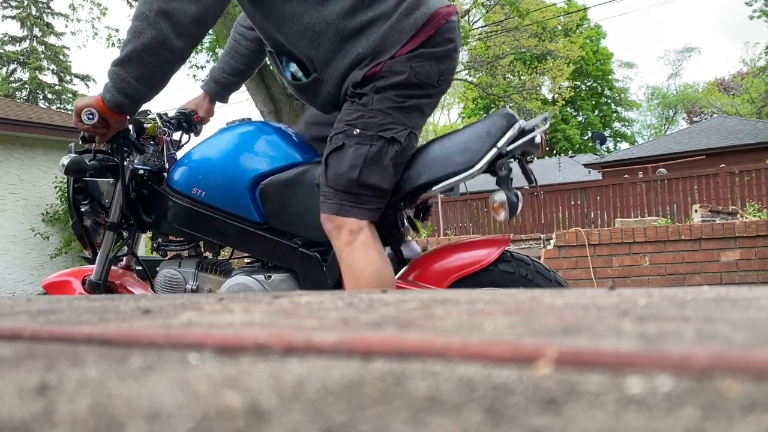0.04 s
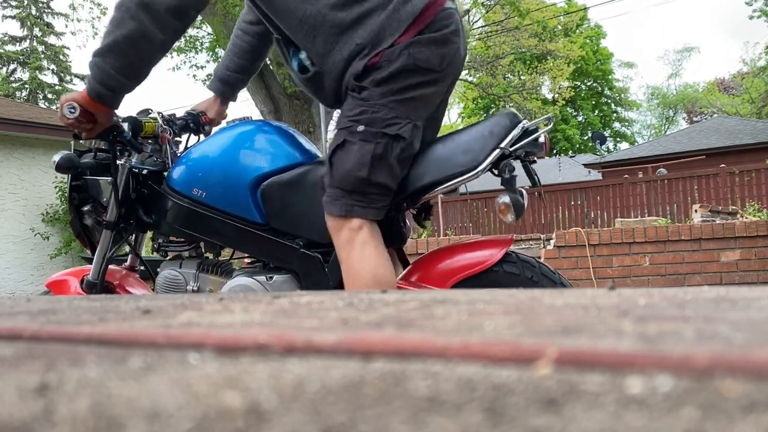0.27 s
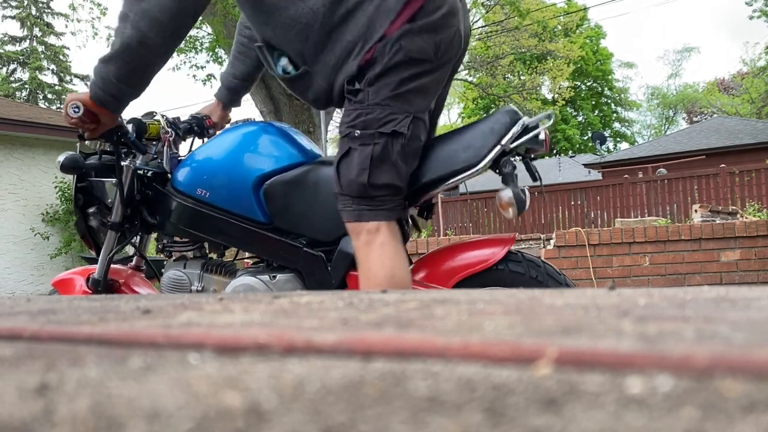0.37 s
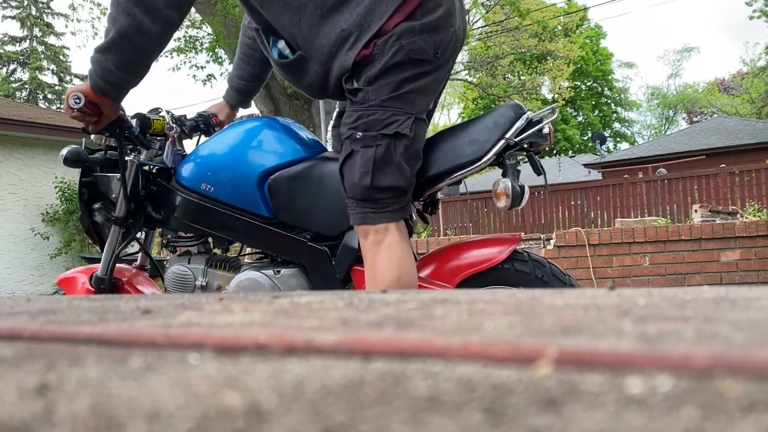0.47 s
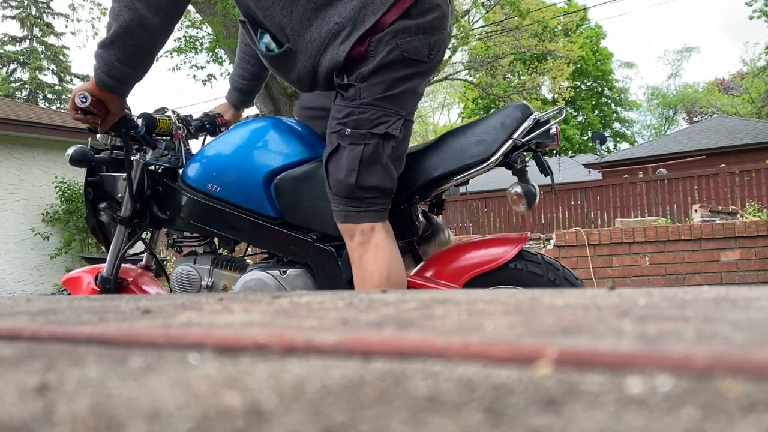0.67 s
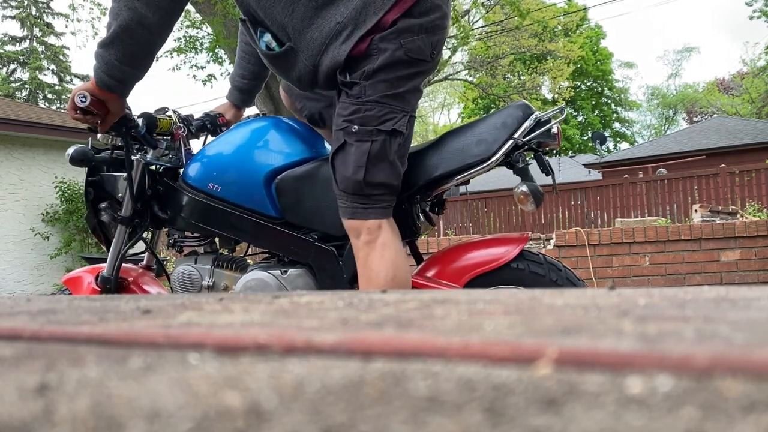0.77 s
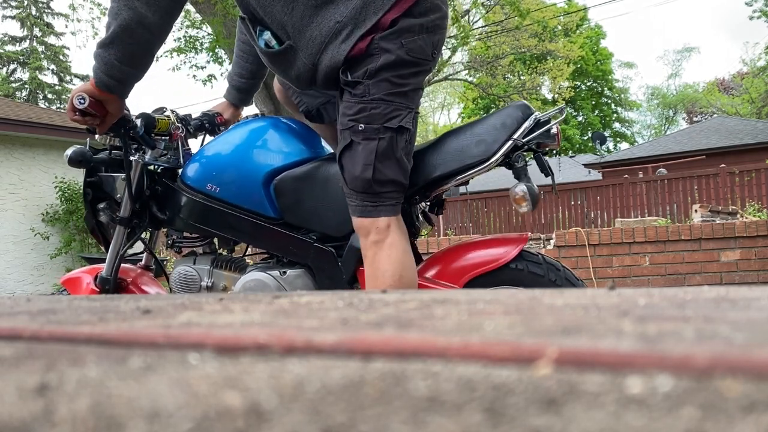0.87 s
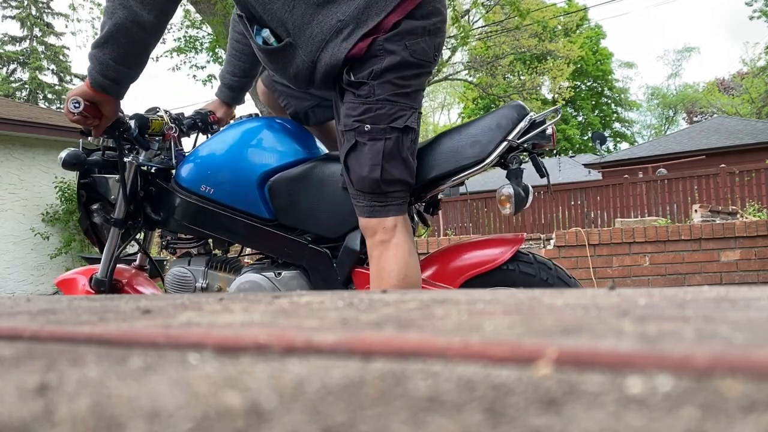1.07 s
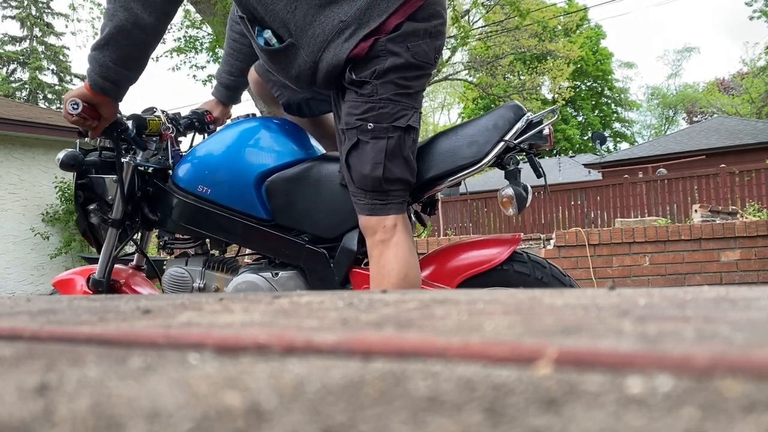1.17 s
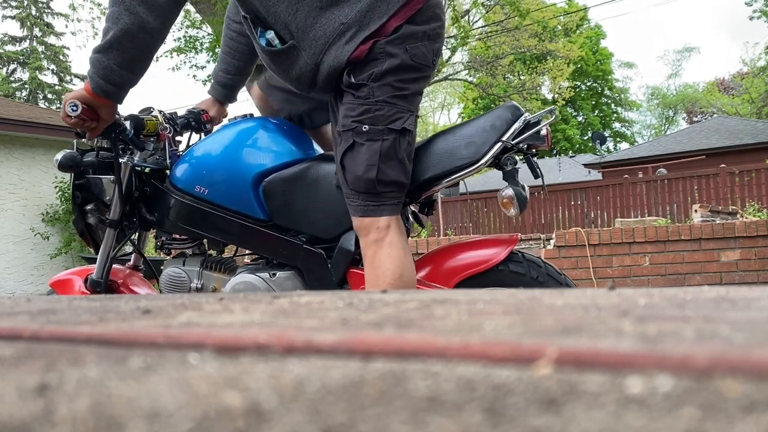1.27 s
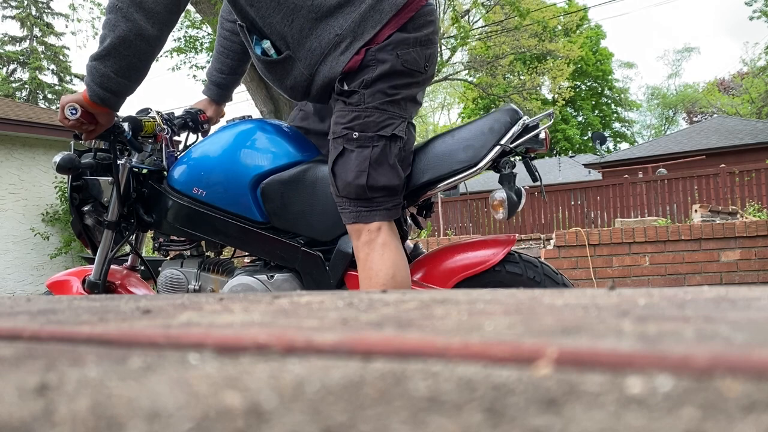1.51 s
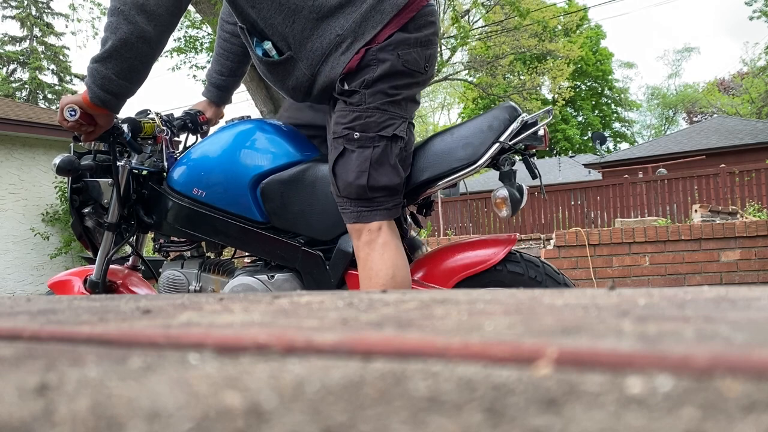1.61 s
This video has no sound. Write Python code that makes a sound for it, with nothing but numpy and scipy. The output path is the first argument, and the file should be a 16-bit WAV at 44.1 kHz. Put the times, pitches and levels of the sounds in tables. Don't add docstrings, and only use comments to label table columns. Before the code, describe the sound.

A small motorcycle engine is kicked over, thumps six quick exhaust strokes, then stalls with a gasp

```python
import sys
import numpy as np
from scipy import signal
from scipy.fft import rfft, irfft
from scipy.io import wavfile
from scipy.ndimage import uniform_filter1d

SR = 44100
rng = np.random.default_rng(int(sys.argv[2]) if len(sys.argv) > 2 else 0)


def volts(x):
    e = np.asarray(x, float) / 20
    return 10 ** e


def dump(signal):
    limited = np.clip(np.atleast_2d(signal).T, -1, 1)
    pcm = np.round(limited * 32767).astype(np.int16)
    wavfile.write(sys.argv[1], SR, pcm)


N = 72765

# crest_s, level_db, pitch_hz, swell_s, bite_db
STROKES = [
    (0.227, 0, 105, 0.018, -8),
    (0.3, -5, 105, 0.022, -16.5),
    (.358, -3, 91, 0.021, -24),
    (0.443, -3, 96.5, 0.028, -15.5),
    (0.533, -5.5, 90, .016, -23),
    (0.639, -6.5, 108, 0.0161, -19.5),
]
# centre_hz, width_hz, level_db
PIPE_MODES = [(206.2, 52, 7), (314, 32.5, -1), (435.4, 13.7, -1.5), (668, 63, -13.5), (785, 150, -18)]
# time_s, level_db
TURNING_LEVEL = [(0.04, -61), (0.108, -43), (0.142, -68), (0.206, -28), (0.318, -22.5), (0.402, -28.5),
                 (0.586, -34), (0.616, -40), (0.68, -43)]
# time_s, level_db
RETURN_LEVEL = [(1.3, -61), (1.355, -47.5), (1.38, -42), (1.438, -39.5), (1.456, -44.5), (1.474, -40),
                (1.5, -54), (1.53, -62), (1.6, -101)]
# centre_hz, width_hz, level_db
CASE_MODES = [(1723, 133, 4.5), (2207, 63, 4.5), (2610, 240, -1), (3174, 42, -0.5), (4500, 86, -7.5),
              (6080, 71, 2.5), (6770, 150, -17.5), (7560, 55, -2.5)]
# freq_hz, level_db
CLATTER_SPECTRUM = [(180, -84), (300, -4.5), (1110, -14.5), (1670, -15), (7500, -19), (9140, -19.5),
                    (9930, -23.5), (13600, -31), (15500, -40)]
# freq_hz, level_db
SCRAPE_SPECTRUM = [(300, -0.5), (900, -0.5), (1500, -0.5), (2600, -6.5), (3300, -17), (5300, -16),
                   (6700, -8), (12000, -28)]
# start_s, peak_db, pitch_hz
LEVER_TICKS = [(0.0713, -38, 3630), (0.0879, -34, 1610), (0.1588, -26, 1360), (0.1792, -25, 3350),
               (0.2044, -13, 1700), (0.2084, -13.5, 2293), (0.2217, -5, 926), (0.2413, -11, 6040),
               (0.274, -31, 1710), (0.4733, -16, 2040), (0.5162, -43, 2180), (0.5304, -10, 2010),
               (0.5785, -13, 1780), (1.1028, -46, 940), (1.1682, -33, 1730), (1.2855, -36, 1690),
               (1.2979, -30.5, 1560), (1.3299, -28.5, 1700), (1.395, -25, 1560), (1.505, -28, 1550),
               (1.5524, -37, 3350)]
# freq_hz, level_db
CRACK_SPECTRUM = [(300, 16), (1200, 2), (4500, -2), (8000, -0.5), (15500, -53)]
# start_s, peak_db, pitch_hz, t60_s
FRAME_KNOCKS = [(.210, -18, 630, .14), (.216, -16, 905, .09), (.305, -20, 4200, .25), (.44, -23, 2200, .2),
                (.55, -25, 1700, .2), (.621, -18, 430, .12), (1.169, -46, 2100, .05),
                (1.298, -40, 1700, .06), (1.300, -38, 1150, .05), (1.303, -36, 380, .14),
                (1.304, -37, 660, .12), (1.333, -42, 4600, .03), (1.436, -40, 920, .06),
                (1.518, -49, 5000, .05), (1.553, -46, 3350, .12)]
# start_s, length_s, level_db
AIR_PUFFS = [
    (.672, .068, -30),
    (1.36, .095, -51),
    (1.46, .036, -41),
    (1.512, .045, -57),
]
# freq_hz, level_db
AIR_SPECTRUM = [(500, -16), (2400, 1), (4400, -12), (6400, 4), (9000, -8), (12000, 2), (13000, -10),
                (15500, -2)]
# freq_hz, level_db
TRAFFIC_SPECTRUM = [(25, -41), (60, 2.5), (125, 7), (250, -11), (500, -15.5), (1100, -23.5), (4750, -36),
                    (15500, -51.5)]
# freq_hz, level_db
MOWER_PARTIALS = [(228, -52), (340, -67), (456, -64)]
# freq_hz, left_lead_rad
PORT_PHASE = [(0, 0), (4600, .3), (5500, -2.6), (6600, -6.3), (8400, -9.3), (9600, -9.5), (11300, -12.5),
              (12900, -12.7), (14500, -15.2)]
# freq_hz, likeness_0_to_1
PORT_LIKENESS = [(60, .999), (250, .97), (700, .55), (1500, .65), (3000, .8), (6000, .65), (8200, .998),
                 (15000, .99)]
# freq_hz, left_minus_right_db
PORT_LEAN = [(60, .6), (180, 1.5), (600, 4), (1650, 2), (5000, 1), (15000, 0)]


def evened(x):
    return x / np.sqrt(np.mean(x ** 2) + 1e-20)


def read(points, hz):
    f, value = np.transpose(points)
    return np.interp(np.log(hz + 1), np.log(f + 1), value)


def add(mix, start_s, sound):
    part = mix[round(start_s * SR):][:len(sound)]
    part += sound[:len(part)]


def colour(x, spectrum):
    return irfft(rfft(x) * volts(read(spectrum, np.fft.rfftfreq(len(x), 1 / SR))), len(x))


def resonate(x, hz, width_hz):
    r = np.exp(-np.pi * width_hz / SR)
    pole = r * np.exp(2j * np.pi * hz / SR)
    return 2 * signal.lfilter([1 - r], [1, -pole], x + 0j).real


def resonate_twice(x, hz, width_hz):
    return resonate(resonate(x, hz, width_hz), hz, width_hz)


def gain_over_time(curve):
    s, db = np.transpose(curve)
    return volts(np.interp(np.arange(N) / SR, s, db, -120, -120))


def exhaust():
    fall_share, settle_s = 0.45, 0.005
    chirp_hz, chirp_s = 303, 0.005
    steepen, shove_db = 0.18, -12
    muffler_hz, muffler_t60_s, muffler_db = 121, 0.22, -9
    echo_share, echo_hz = 0.83, 23.1
    bite_rise_s, bite_fall_s = 0.0081, 0.031
    t, push, bite = np.arange(N) / SR, np.zeros(N), np.zeros(N)
    for crest_s, db, hz, swell_s, bite_db in STROKES:
        u = t - crest_s
        since, after = np.maximum(u + swell_s, 0), np.maximum(u, 0)
        rise = np.cos(np.pi / 2 * np.clip(u / swell_s, -1, 0))
        fall = np.exp(-(u / (fall_share * swell_s)) ** 2)
        throb = 1 - echo_share * np.sin(2 * np.pi * echo_hz * after)
        ring = volts(muffler_db - 60 * after / muffler_t60_s) * throb
        shape = np.where(u < 0, rise, fall + (1 - fall) * ring)

        pitch_hz = hz + (muffler_hz - hz) * (1 - np.exp(-after / settle_s))
        pitch_hz += chirp_hz * volts(bite_db - db) * np.exp(-since / chirp_s)
        turns = np.cumsum(pitch_hz) / SR
        angle = 2 * np.pi * (turns - np.interp(crest_s, t, turns))
        wave = np.cos(angle) + steepen * np.cos(2 * angle + 0.7)
        shove = volts(shove_db) * np.exp(-(u / swell_s) ** 2) * u / swell_s
        push += volts(db) * (shape * wave + shove)
        bite += volts(bite_db) * np.minimum(since / bite_rise_s, 1) * np.exp(-since / bite_fall_s)
    puff = rng.standard_normal(N)
    pipe = sum(volts(db) * resonate_twice(puff, hz, width_hz) for hz, width_hz, db in PIPE_MODES)
    return push + evened(pipe) * bite


def rattle(curve, spectrum, teeth_db, ring_db):
    teeth_per_s, grit_per_s = 100, 1200
    gap_share, tooth_share, mode_drift_db = 0.35, 0.22, 4.0
    speed = 1 + 3.2 * uniform_filter1d(rng.standard_normal(N), size=400)
    turns = np.cumsum(teeth_per_s * speed) / SR
    tooth_sizes = volts(2.5 * np.clip(rng.standard_normal(400), -2, 1.2))
    size = tooth_sizes[turns.astype(int) % 400]
    gate = gap_share + volts(teeth_db) * size * np.exp(-(turns % 1) / tooth_share)

    grit_size = volts(3.5 * np.minimum(rng.exponential(1, N), 2.5))
    grit = (rng.random(N) < grit_per_s / SR) * grit_size * rng.standard_normal(N)
    drive = gate * (rng.standard_normal(N) + 0.39 * evened(grit))

    rings = np.zeros(N)
    for hz, width_hz, db in CASE_MODES:
        drift = evened(uniform_filter1d(rng.standard_normal(N), size=2500))
        mode = resonate_twice(drive, hz, 3.1 * width_hz) / np.sqrt(width_hz)
        rings += volts(db + mode_drift_db * drift) * mode
    body = evened(colour(drive, spectrum)) + volts(ring_db) * evened(rings)
    return gain_over_time(curve) * evened(body)


def ticks():
    tick_t60_s, tick_db = 0.045, -14
    crack_db, crack_rise_s, crack_fall_s = -9.5, 0.00033, 0.0048
    out, hits, t = np.zeros(N), np.zeros(N), np.arange(4000) / SR
    for start_s, db, hz in LEVER_TICKS:
        add(out, start_s, volts(db + tick_db - 60 * t / tick_t60_s) * np.sin(2 * np.pi * hz * t))
        crack = rng.standard_normal(len(t)) * np.minimum(t / crack_rise_s, 1) * np.exp(-t / crack_fall_s)
        add(hits, start_s, volts(db + crack_db) * crack)
    for start_s, db, hz, t60_s in FRAME_KNOCKS:
        ring = evened(resonate_twice(rng.standard_normal(len(t)), hz, 50 + 0.09 * hz))
        add(out, start_s, volts(db - 60 * t / t60_s) * np.minimum(t / 0.002, 1) * ring * 0.47)
    case = sum(volts(db) * resonate(hits, hz, width_hz + 120) for hz, width_hz, db in CASE_MODES)
    return out + colour(hits, CRACK_SPECTRUM) + volts(-5.5) * case


def gasps():
    tail_db, tail_s = -16, 0.05
    t, gate = np.arange(N) / SR, np.zeros(N)
    for start_s, length_s, db in AIR_PUFFS:
        u = np.clip((t - start_s) / length_s, 0, 1)
        fade = np.exp(-np.maximum(t - start_s - length_s, 0) / tail_s)
        gate += volts(db) * (np.sin(np.pi * u) + volts(tail_db) * u * fade)
    return gate * evened(colour(rng.standard_normal(N), AIR_SPECTRUM))


def street():
    traffic_db = -40.5
    t = np.arange(N) / SR
    lumps = evened(uniform_filter1d(rng.standard_normal(N), size=3000))
    wander = 1 - 0.01129 * t + 0.0024 * np.sin(2 * np.pi * 1.66 * t)
    turned_s = np.cumsum(wander) / SR
    hum = sum(volts(db) * np.sqrt(2) * np.sin(2 * np.pi * hz * turned_s) for hz, db in MOWER_PARTIALS)
    wash = np.array([evened(colour(v, TRAFFIC_SPECTRUM)) for v in rng.standard_normal((3, N))])
    return volts(traffic_db + 0.6 * lumps) * wash + hum * volts(2.5 * lumps[::-1])


def echo_tails(t60_s, first_s):
    t = np.arange(SR // 2) / SR
    sparse = rng.random((2, len(t))) < 0.05
    taps = rng.choice([-1., 1.], (2, len(t))) * sparse * (t > first_s) * volts(-60 * t / t60_s)
    return taps / np.linalg.norm(taps, axis=1, keepdims=True)


def scene():
    yard_db, yard_t60_s, ground_t60_s = -19.5, 0.18, 0.086
    bike = rattle(TURNING_LEVEL, CLATTER_SPECTRUM, teeth_db=1.5, ring_db=-4.5)
    bike += rattle(RETURN_LEVEL, SCRAPE_SPECTRUM, teeth_db=-5.5, ring_db=-7.5)
    bike += ticks() + gasps()
    far = street()
    yard = signal.fftconvolve(bike, echo_tails(yard_t60_s, 0.015)[0])[:N]
    bike = exhaust() + bike + volts(yard_db) * yard

    hz = np.fft.rfftfreq(N, 1 / SR)
    like = np.clip(read(PORT_LIKENESS, hz), 0, 1)
    side = np.array([[1], [-1]])
    phase_rad = side * np.interp(hz, *np.transpose(PORT_PHASE)) / 2
    direct = rfft(bike + far[0]) * np.sqrt(like) * np.exp(1j * phase_rad)
    ground = signal.fftconvolve(bike[None], echo_tails(ground_t60_s, 0), axes=1)[:, :N]
    unlike = rfft(ground + far[1:]) * np.sqrt(1 - like)
    return irfft((direct + unlike) * volts(side * read(PORT_LEAN, hz) / 2), N)


def low_pass(x):
    return signal.sosfilt(signal.butter(12, 15740, fs=SR, output="sos"), x)


def record(dry):
    limited = np.tanh(dry * 0.98) / 1.011
    roll_off = [(14000, 0.5), (14800, 5), (15700, -20)]  # freq_hz, level_db
    mix = np.array([colour(v, roll_off) for v in limited])
    return low_pass(mix)


dry = scene()
out = record(dry)
dump(out)
```